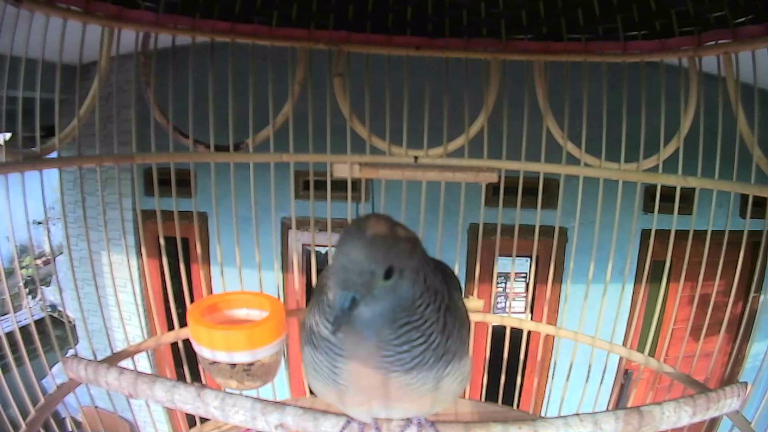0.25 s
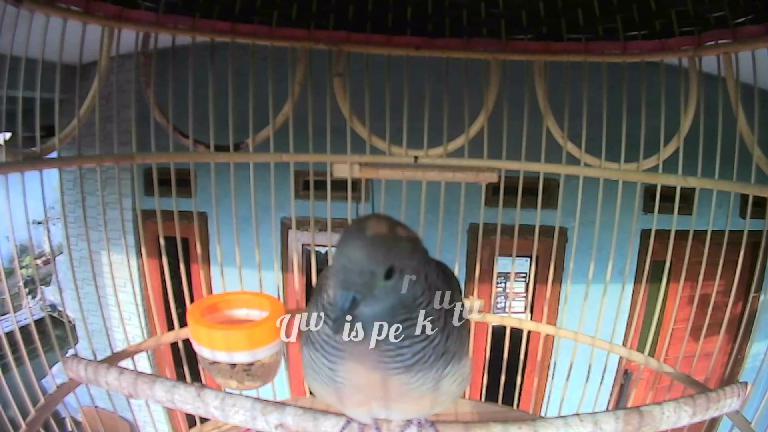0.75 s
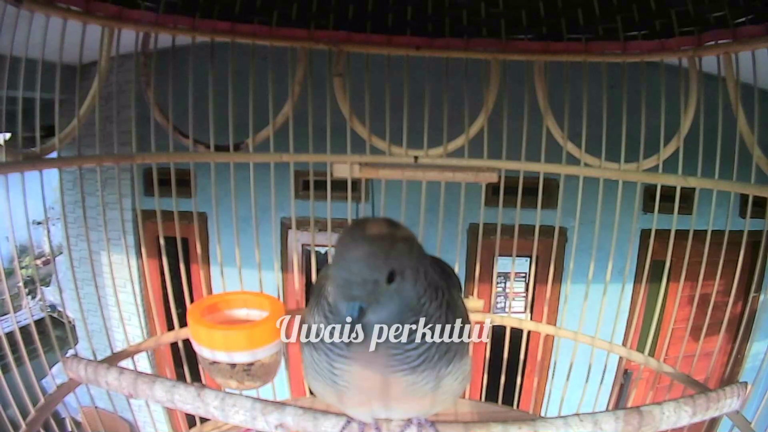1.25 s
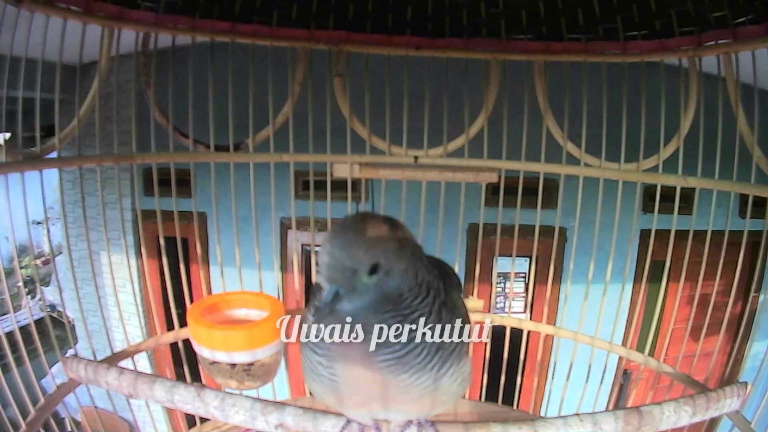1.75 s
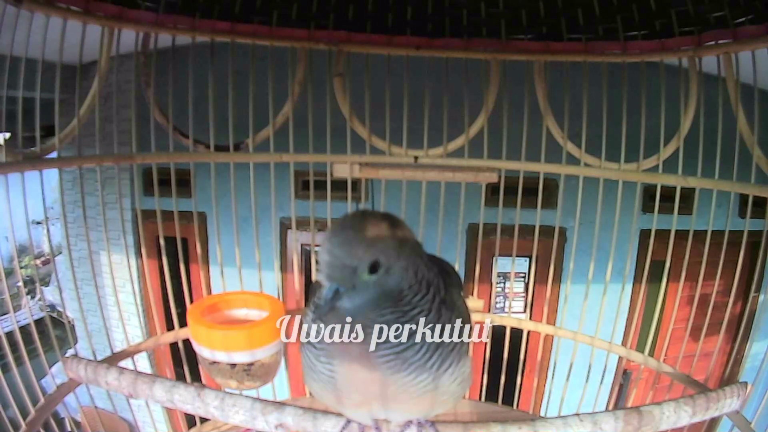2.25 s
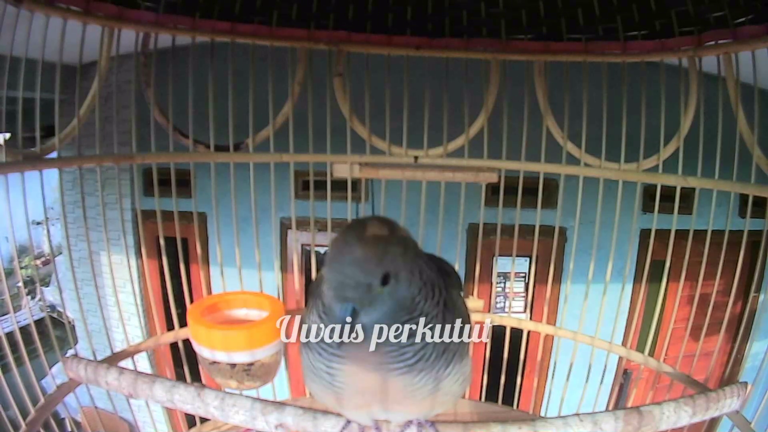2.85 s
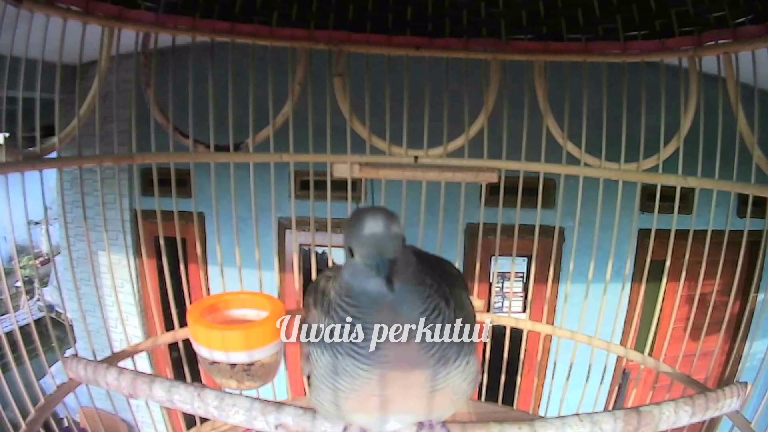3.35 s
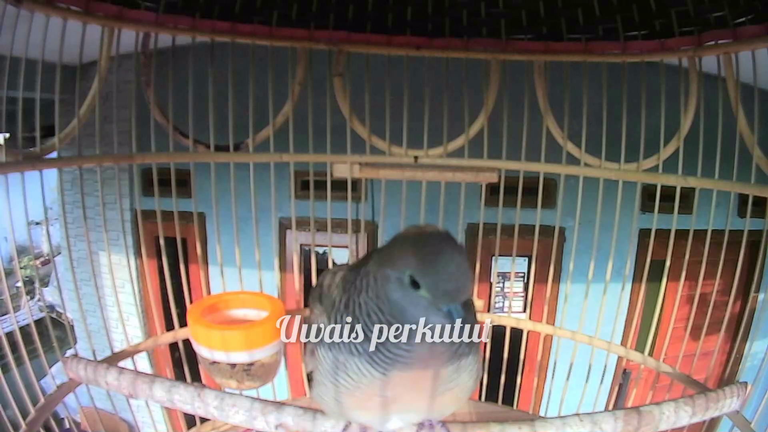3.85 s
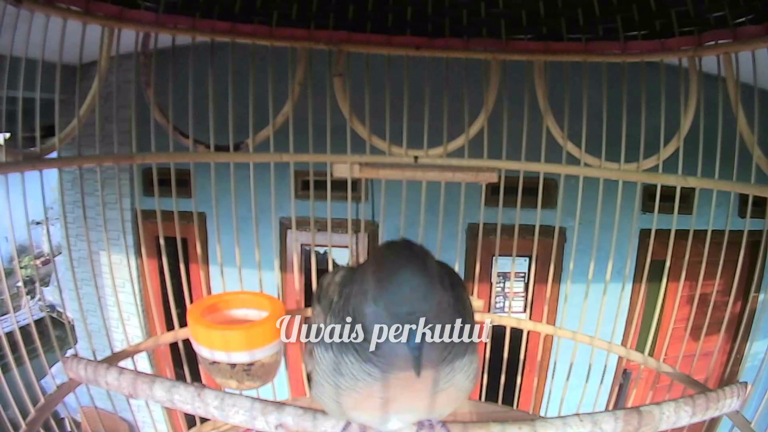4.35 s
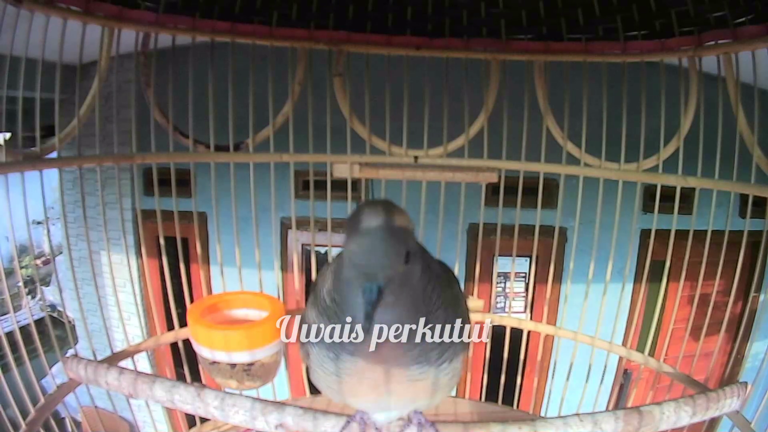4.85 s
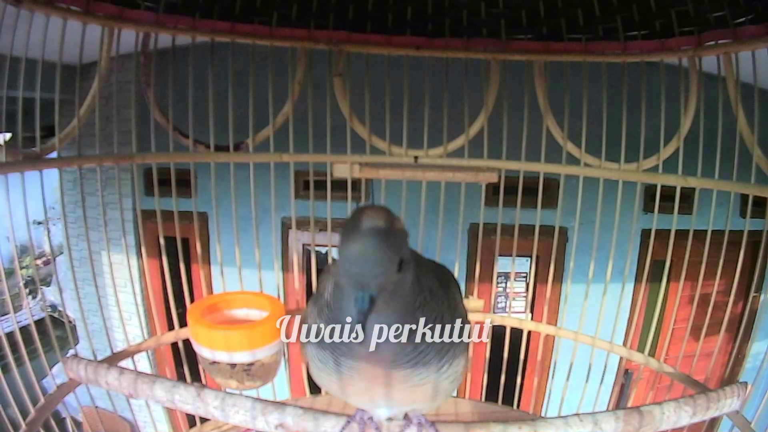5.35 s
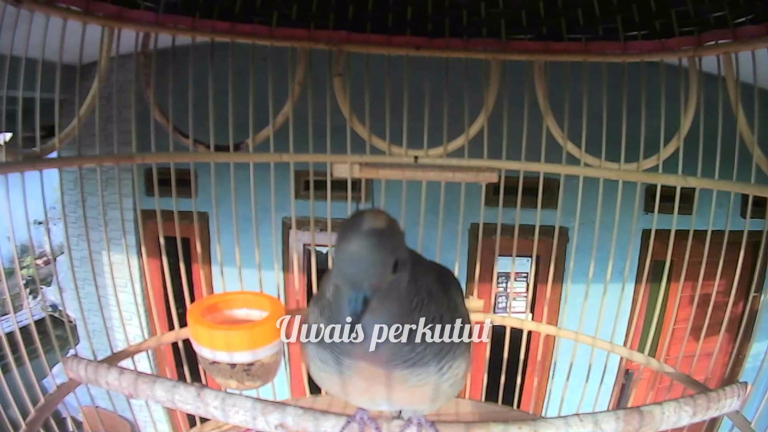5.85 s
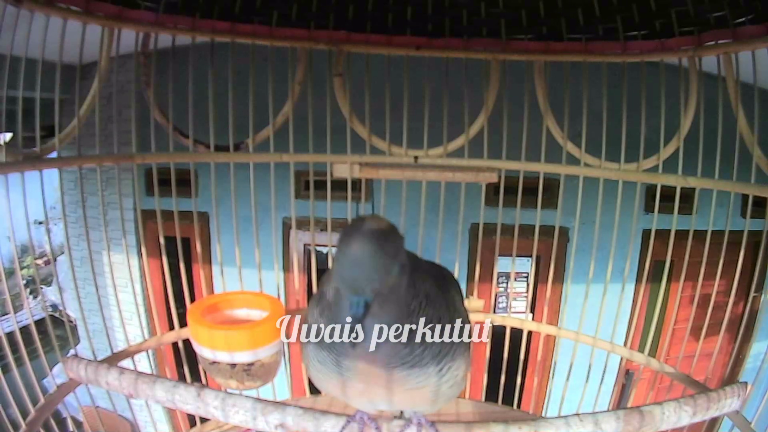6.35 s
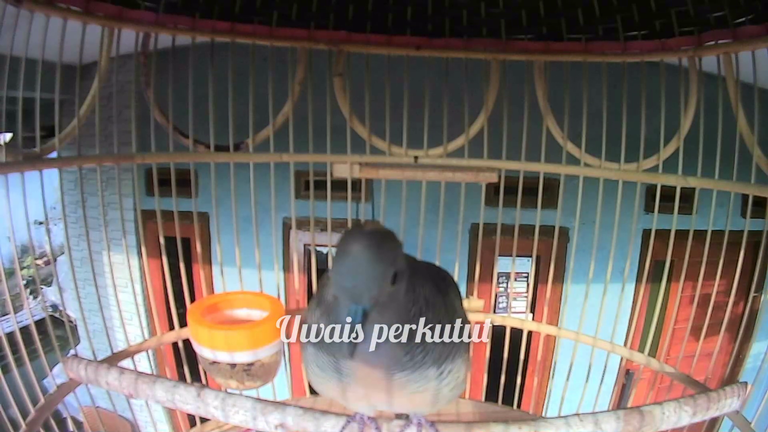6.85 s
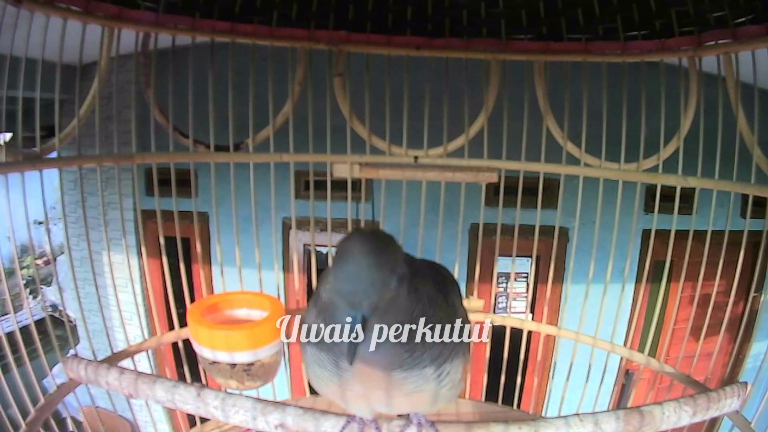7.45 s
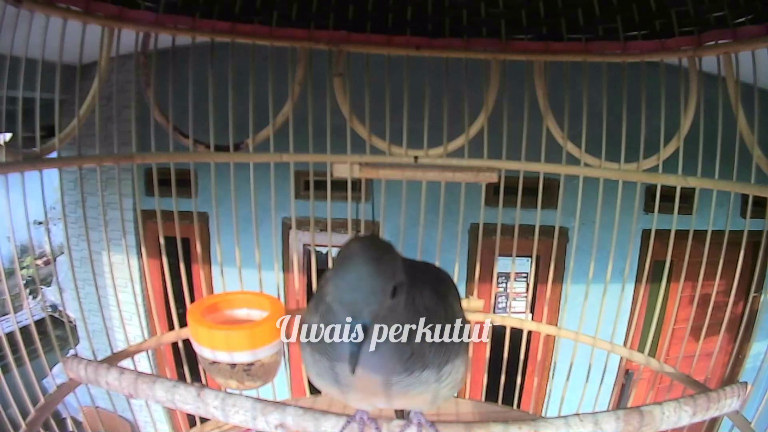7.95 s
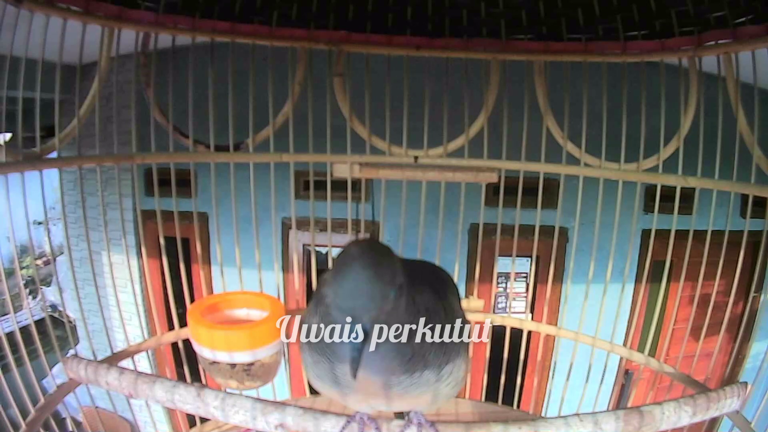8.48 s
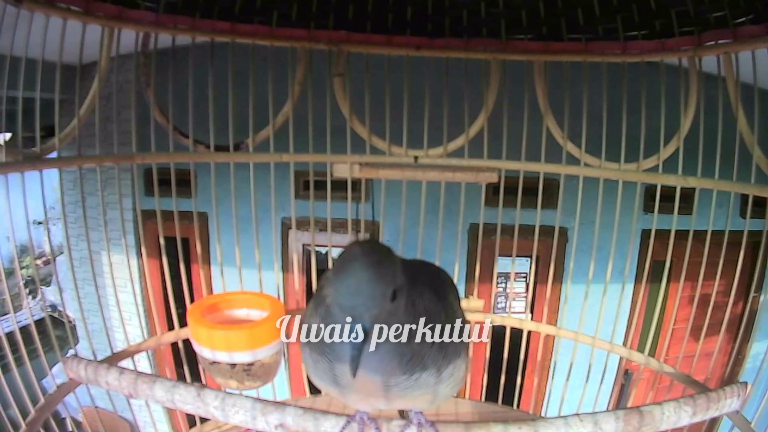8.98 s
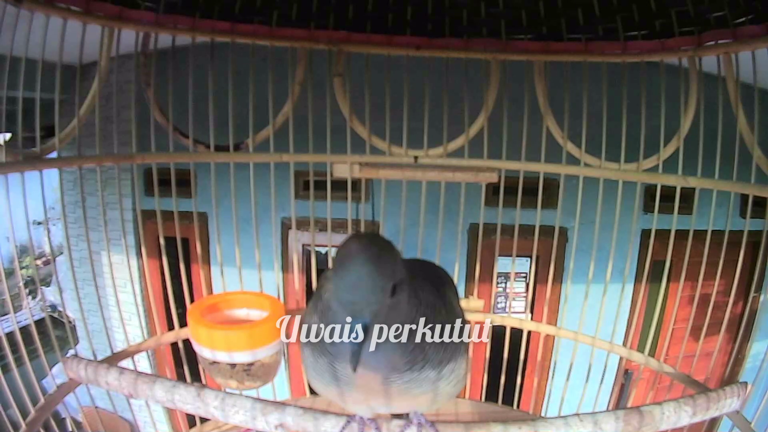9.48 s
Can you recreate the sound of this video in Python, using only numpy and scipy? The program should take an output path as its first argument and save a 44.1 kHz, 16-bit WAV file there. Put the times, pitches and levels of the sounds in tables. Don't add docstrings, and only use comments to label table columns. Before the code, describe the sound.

On a porch by a street, low engine idle and soft traffic rumble lie under faint songbirds and a distant dove. A neighbouring caged dove calls three times: a warbled fall, two short notes, a longer one. Just after five seconds a dove right at the small microphone coos a dozen loud, rapid, sputtering notes that clip, then two softer four-note phrases. Walls echo lightly.

```python
import sys
import numpy as np
from scipy import signal
from scipy.fft import rfft, irfft, next_fast_len
from scipy.io import wavfile
from scipy.ndimage import uniform_filter1d, map_coordinates

SR = 44100
rng = np.random.default_rng(int(sys.argv[2]) if len(sys.argv) > 2 else 0)


def amp(db):
    return 10 ** (np.asarray(db, float) / 20)


def write(x):
    x = np.atleast_2d(x).T
    wavfile.write(sys.argv[1], SR, np.round(np.clip(x, -1, 1) * 32767).astype(np.int16))


N = 428652

# snap to the high note in s, end in s, high note in Hz,
# effort at the snap in dB, held level in dB.
NEAR_BOUT = [(5.2854, 5.361, 1485, -5, -7.6), (5.411, 5.418, 1400, -.5, -6),
             (5.504, 5.530, 1425, -1.5, -6.5), (5.614, 5.637, 1430, -1.6, -5.2),
             (5.728, 5.828, 1480, -2.7, -9.7), (5.958, 6.059, 1480, -4, -8.5),
             (6.1925, 6.297, 1480, -4, -9), (6.4407, 6.555, 1475, -5, -9.5),
             (6.692, 6.807, 1475, -5.2, -9.7), (6.948, 7.062, 1469, -5.3, -10.2),
             (7.2125, 7.325, 1458, -5.5, -10.2), (7.4735, 7.587, 1447, -6.2, -10)]
NEAR_PHRASES = [
    (7.869, 7.912, 1405, -7.5, -10),
    (7.988, 8.015, 1400, -5.8, -9.3),
    (8.0955, 8.139, 1405, -8, -9),
    (8.238, 8.361, 1430, -7.5, -11.5),
    (8.7942, 8.833, 1400, -7.5, -10.5),
    (8.923, 8.949, 1400, -6.5, -10.5),
    (9.03, 9.062, 1394, -7.5, -9),
    (9.1503, 9.272, 1407, -6.6, -9.8),
]
# first slap in s, slap peak in dB, voice takes hold in s.
NEAR_ONSETS = [(5.248, -24, 5.266), (5.3783, -25.5, 5.386), (5.4829, -19.5, 5.487), (5.585, -24.5, 5.597),
               (5.7039, -22.5, 5.712), (5.9284, -25, 5.941), (6.1595, -26.5, 6.175), (6.4065, -27, 6.424),
               (6.6617, -26, 6.676), (6.9157, -27.5, 6.93), (7.178, -26, 7.194), (7.4389, -25, 7.456),
               (7.84, -24, 7.854), (7.9738, -29.5, 7.977), (8.0732, -28, 8.083), (8.2158, -23, 8.222),
               (8.7603, -28, 8.779), (8.9054, -28.5, 8.913), (9.0127, -25.5, 9.018), (9.1334, -32, 9.139)]
# multiple of the pitch, level in dB.
NEAR_OVERTONES = [(2, -35.5), (3, -61), (4, -57)]
# centre in Hz, width in Hz, level in dB.
THROAT_SAC = [(1200, 700, 4.5), (1800, 690, -8.5)]
SLAP_GAPS = [.0052, .0042, 0.003386, .0028, 0.002363, .0021, 0.0017, 0.0019]
# start in s, end in s, from Hz, to Hz, level in dB.
NEIGHBOUR_FALLS = [
    (1.243, 1.408, 1230, 1123, -15.5),
    (3.19, 3.315, 1215, 1145, -17.5),
    (5.178, 5.265, 1195, 1130, -20),
    (7.43, 7.59, 1193, 1105, -19),
]
# first crest in s, end in s, crests per second, depth in Hz, depth in dB.
NEIGHBOUR_WARBLE = [(1.277, 1.407, 26, 23, 0.5), (3.223, 3.321, 25.5, 18.6, 1), (5.211, 5.264, 25.5, 23, 1),
                    (7.454, 7.576, 29, 30, -1)]
# start in s, end in s, top in Hz, level in dB, time to the top in s.
NEIGHBOUR_ARCHES = [(1.424, 1.446, 1000, -19.5, 0.011), (1.494, 1.508, 1010, -19.5, 0.0033),
                    (1.577, 1.656, 1103, -17, 0.02), (3.313, 3.362, 1135, -16.5, .021),
                    (3.388, 3.41, 1060, -15, 0.0046), (3.457, 3.48, 1070, -16, .005),
                    (3.54, 3.633, 1112, -18, 0.0073), (5.296, 5.352, 1125, -19.5, .036),
                    (5.362, 5.387, 1040, -17, .016), (5.436, 5.463, 1045, -18, .005),
                    (5.53, 5.592, 1110, -18.5, 0.0056), (7.595, 7.635, 1070, -17, .006),
                    (7.675, 7.698, 1052, -16.5, 0.0039), (7.755, 7.846, 1106, -17.5, .005)]
# multiple of the pitch, level in dB.
NEIGHBOUR_OVERTONES = [(2, -44.5), (3, -39.5), (7, -44), (8, -64)]
# start in s, end in s, from Hz, to Hz, level in dB.
DISTANT_FALLS = [
    (0.151, 0.333, 1270, 1165, -46),
    (2.828, 3.04, 1265, 1144.5, -46),
    (9.619, 9.716, 1241, 1210, -51),
]
# start in s, end in s, top in Hz, level in dB, time to the top in s.
DISTANT_ARCHES = [
    (.345, .365, 1140, -37.5, .005),
    (.42, .44, 1125, -40, .005),
    (.54, .635, 1200, -40, 0.0099),
]
# start in s, end in s, from Hz, to Hz, crest in dB.
SONGBIRD_GLIDES = [(1.06, 1.3, 2640, 2620, -50), (1.31, 1.4, 2100, 2050, -50),
                   (2.24, 2.31, 2280, 2233, -44), (3.5, 3.6, 2740, 2600, -49),
                   (4.55, 4.68, 2536, 2620, -49), (8.48, 8.62, 2400, 2418, -49),
                   (9.66, 9.715, 2200, 2260, -49.5)]
# start in s, end in s, from Hz, to Hz, crest in dB.
MACHINE_WHINES = [
    (7.2, 7.9, 458, 474, -48.5),
    (8.3, 9.5, 999, 1017, -46.5),
]
# start in s, end in s, from Hz, to Hz, crest in dB.
PASSING_MOTOR = [
    (2.7, 3.25, 151.3, 152, -37),
    (3.4, 4.15, 130, 132, -37.5),
]
# start in s, peak in dB, centre in Hz, time to fall 60 dB in s.
CAGE_RUSTLES = [(2.4608, -39.5, 3746, 0.095), (3.291, -36.5, 3560, 0.08), (.146, -23, 2150, .2),
                (4.609, -40, 8500, 0.16), (7.6, -46, 8530, .15)]
# time in s, firing rate in Hz, throb in dB, drone in dB.
ENGINE_IDLE = [(0.0, 38.4, -40.5, -51.5), (2.03, 38.19, -33, -54.5), (3.25, 38.06, -40, -45),
               (3.44, 41.06, -36, -59.5), (4.52, 37.62, -37, -53.5), (9.56, 38.21, -37, -46),
               (9.72, 39.53, -38, -59)]
# multiple of the firing rate, level in dB.
ENGINE_ORDERS = [(2, 7), (3, 4), (4, 0), (5, 1.5)]
# time in s, level in dB.
TRAFFIC_LEVEL = [(0.0, -35.5), (1.43, -36), (1.59, -35), (5.9, -35.5), (6.79, -32), (9.72, -36)]
# frequency in Hz, density in dB per Hz.
RUMBLE_COLOUR = [(8.8, -31), (15, -3), (43, -3), (64, -4), (139, -8), (254, -23), (339, -30), (400, -35.5),
                 (520, -63.5), (880, -120)]
# frequency in Hz, density in dB per Hz.
MURMUR_COLOUR = [(150, -32.5), (250, -4.5), (339, -2.5), (400, -3), (450, -3), (583, -7), (687, -2.5),
                 (810, -4), (1180, -10), (1340, -8.5), (2030, -6.5), (2280, -1.5), (4150, -22.5),
                 (5400, -50.5), (9130, -120)]
# frequency in Hz, density in dB per Hz.
HISS_COLOUR = [(3800, -38), (4300, -13), (5450, -9.5), (5900, 0), (6300, 1), (6700, -5.5), (7100, 1),
               (7600, -8.5), (8200, -14), (9000, -17.5), (9600, -34), (12000, -59)]
# delay in s, level in dB.
WALL_ECHOES = [(.006, -27.5), (.011, -16.5), (.017, -23), (.024, -17), (.033, -28.5), (.046, -39),
               (0.06, -26.5)]
# frequency in Hz, density in dB per Hz.
GRIT_COLOUR = [(6000, -40), (8000, 0.5), (11000, -2), (15500, -5)]
# frequency in Hz, gain in dB.
MIC_RESPONSE = [(100, -0.5), (7400, 1.5), (8600, -3.5), (12500, -6), (14800, -5.5), (15650, -6.5),
                (15780, -70.5)]


def near_dove():
    # Hz at the start, Hz once it holds, rise in Hz/s, dB once it holds
    bout_low, phrase_low = (1075, 1140, 7500, -7.8), (1010, 1055, 16000, -11)
    # effort kept at the snap (0-1), place of the highest point (0-1), droop in Hz, release in s
    bout_end, phrase_end = (.5, .5, 85, .0065), (.1, .17, 45, .010)
    first_slap, peak_db, holds = np.transpose(NEAR_ONSETS)
    rows = [(*row, bout_low, bout_end) for row in NEAR_BOUT]
    rows += [(*row, phrase_low, phrase_end) for row in NEAR_PHRASES]
    notes = [coo(start, *row) for start, row in zip(holds, rows)]
    voice = whistle(notes, NEAR_OVERTONES, .003, waver_hz=3, bend_db=.3 * wobble(60), strain=0.055)
    tone = filtered(voice, lambda f: 1 + amp(-4) * resonance(f, hz=1190, width=26))
    return tone + flaps(first_slap, holds + .002, peak_db + 29.5, THROAT_SAC, swell_db=7.5, slow=1.05)


def coo(start, snap, end, high, effort, held, low, ending):
    attack_s, attack_db = .004, 11
    snap_s, snap_hz, settle_s, settle_hz = .004, 45, .015, 15
    sag_hz_per_s, droop_s = 500, .013
    release_hz, release_db = 30, 11
    low_start_hz, low_hz, rise_hz_per_s, low_db = low
    kept, top, droop_hz, release_s = ending
    length = end - snap
    room = np.clip(length / .1, .1, 1)
    droop = end - release_s - droop_s * room
    sag = high - sag_hz_per_s * length / 2
    drooped = sag - droop_hz * room
    push = max(1.1 * (effort - held - 3.3), .8) * room
    ready = low_hz + 10 * (effort + 5.5) + rise_hz_per_s * (snap - snap_s - start - attack_s)
    return shaped((start, low_start_hz, low_db - attack_db),
                  (start + attack_s, low_hz, low_db),
                  (snap - snap_s, ready, effort),
                  (snap, high - snap_hz, held + kept * (effort - held)),
                  (min(snap + settle_s, droop), high - settle_hz, held + .4 * push),
                  (min(snap + top * length, droop), high, held),
                  (droop, sag, held + push),
                  (end - release_s, drooped, held + push),
                  (end, drooped - release_hz, held - release_db))


def flaps(starts, ends, levels_db, throat, swell_db, slow):
    slaps = np.zeros(N)
    chances = rng.standard_normal((len(starts), 2, len(SLAP_GAPS)))
    gaps = slow * np.array(SLAP_GAPS)
    for start, end, level, (timing, force) in zip(starts, ends, levels_db, chances):
        at = start + np.cumsum(gaps * amp(.8 * timing)) - gaps[0]
        grown = 1 - np.exp(-(at - start) / 0.0055)
        slaps[(at * SR).astype(int)] = amp(level + swell_db * grown + 0.99 * force) * (at < end)

    def throat_response(f):
        soft = resonance(f, 1234, 1900) ** 2
        modes = sum((-1) ** k * amp(db) * resonance(f, hz, width) for k, (hz, width, db) in enumerate(throat))
        return soft * modes ** 2

    return filtered(slaps, throat_response)


def whistle(notes, overtones, edge, waver_hz, bend_hz=0, bend_db=0, strain=0):
    t = np.arange(N) / SR
    pitch, gain = np.full(N, 1000.), np.zeros(N)
    for note in notes:
        s, hz, db = np.transpose(note)
        on = slice(int((s[0] - edge) * SR), int((s[-1] + edge) * SR))
        pitch[on] = np.interp(t[on], s, hz)
        fade = np.clip(np.minimum(t[on] - s[0], s[-1] - t[on]) / edge + 1, 0, 1)
        gain[on] = np.maximum(gain[on], amp(np.interp(t[on], s, db)) * fade ** 2)
    pitch = uniform_filter1d(pitch, size=30) + bend_hz + waver_hz * wobble(90)
    phase = 2 * np.pi * np.cumsum(pitch) / SR
    rich_db = np.clip(strain * (pitch - 1470), -4.5, 0)
    wave = np.sin(phase)
    for k, db in overtones:
        level_db = db + rich_db * (round(k) == 2) + 2.1 * wobble(50)
        wave += amp(level_db) * np.sin(round(k) * phase)
    return np.sqrt(2) * uniform_filter1d(gain, size=40) * amp(bend_db) * wave


def neighbour_dove():
    t, swing_hz, swing_db = np.arange(N) / SR, np.zeros(N), np.zeros(N)
    for crest, end, rate, depth_hz, depth_db in NEIGHBOUR_WARBLE:
        on = (t > crest - .03) & (t < end)
        turn = 2 * np.pi * rate * (t[on] - crest)
        swing_hz[on] = depth_hz * (np.cos(turn) + 0.51 * np.sin(2 * turn))
        swing_db[on] = depth_db * np.cos(turn)
    notes = [fall(*row, fade_db=5) for row in NEIGHBOUR_FALLS]
    notes += [arch(*row, rest_hz=1000) for row in NEIGHBOUR_ARCHES]
    tone = whistle(notes, NEIGHBOUR_OVERTONES, 0.0037, waver_hz=6, bend_hz=swing_hz, bend_db=swing_db)
    opens = np.transpose(NEIGHBOUR_WARBLE)[0] - .034
    wide_throat = [(1130, 240, 3.6), (900, 340, -2.0)]  # Hz, width Hz, dB
    opening = flaps(opens - .028, opens + .012, np.full(len(opens), -4.), wide_throat, swell_db=13, slow=1.5)
    starts = np.array([note[0][0] for note in notes])
    levels_db = np.full(len(starts), -1.)
    sputter = flaps(starts - .015, starts - .004, levels_db, [(1080, 290, .1)], swell_db=3.5, slow=.8)
    return tone + opening + sputter


def fall(start, end, from_hz, to_hz, db, fade_db):
    swell_s, swell_db = .028, 5
    drop_s, drop_hz, drop_db = .013, 50, 3.5
    return shaped((start, from_hz - 12, db - swell_db),
                  (start + swell_s, from_hz, db),
                  (end - drop_s, to_hz, db - fade_db),
                  (end, to_hz - drop_hz, db - fade_db + drop_db))


def arch(start, end, top, db, climb, rest_hz):
    edge_s, edge_db, leap_s, droop_s = .004, 11.5, .004, .012
    sag = top - 400 * (end - start)

    def thin(hz):
        return db - 0.02 * max(hz - rest_hz, 0)

    return shaped((start, rest_hz, db - edge_db),
                  (start + edge_s, rest_hz, db - 2.0),
                  (start + climb, (top + rest_hz) / 2, db + .6),
                  (start + climb + leap_s, top, thin(top)),
                  (end - edge_s - droop_s * (top - rest_hz) / 100, sag, thin(sag)),
                  (end - edge_s, rest_hz, db - .6),
                  (end, rest_hz - 15, db - edge_db))


def far_birds():
    notes = [fall(*row, fade_db=-5) for row in DISTANT_FALLS]
    notes += [arch(*row, rest_hz=1110) for row in DISTANT_ARCHES]
    dove = whistle(notes, [], 0.0071, waver_hz=12, bend_db=2.6 * wobble(24))
    chirps = glides(SONGBIRD_GLIDES, crest=0.3, rise_db=3.5, fade_db=8.5)
    songbirds = whistle(chirps, [], 0.0086, waver_hz=30.0)
    hums = glides(MACHINE_WHINES + PASSING_MOTOR, crest=.7, rise_db=12.5, fade_db=10.5)
    machines = whistle(hums, [], .06, waver_hz=5.6)
    return dove + songbirds + machines


def glides(rows, crest, rise_db, fade_db):
    return [shaped((start, from_hz, db - rise_db),
                   (start + crest * (end - start), from_hz + crest * (to_hz - from_hz), db),
                   (end, to_hz, db - fade_db))
            for start, end, from_hz, to_hz, db in rows]


def rustles():
    out, t = np.zeros(N), np.arange(SR // 4) / SR
    for s, db, hz, t60 in CAGE_RUSTLES:
        band = signal.butter(4, [hz * .88, hz * 1.17], "bandpass", fs=SR, output="sos")
        puff = unit(signal.sosfilt(band, rng.standard_normal(len(t))))
        out[round(s * SR):][:len(t)] += amp(db - 12.0 - 60 * t / t60) * puff
    return out


def porch(x, early_db, tail_db, t60):
    t = np.arange(SR // 2) / SR
    tail = rng.standard_normal(len(t)) * amp(-60 * t / t60) * np.clip(t / 0.015, 0, 1)
    answer = amp(tail_db) * tail / np.linalg.norm(tail)
    for s, db in WALL_ECHOES:
        answer[round(s * SR)] += amp(db + early_db)
    return x + signal.fftconvolve(x, answer)[:N]


def overload(x, top, hard, leak_db, grit_db, grit_grows):
    coarse = signal.resample_poly(x, 160, 441)
    clipped = coarse / (1 + np.abs(coarse / top) ** hard) ** (1 / hard)
    excess = clipped - coarse
    smooth = signal.resample_poly(excess, 3, 1)
    spikes = np.kron(excess, [3, 0, 0])
    cut = np.abs(signal.resample_poly(excess, 441, 160)[:N])
    cut = np.abs(uniform_filter1d(cut, size=18))
    grit = amp(grit_db) * cut ** grit_grows * rush(GRIT_COLOUR, patchy_db=1.5)
    leaky = smooth + amp(leak_db) * (spikes - smooth)
    return x + grit + signal.resample_poly(leaky, 147, 160)[:N]


def street():
    rumble_db, = curves(TRAFFIC_LEVEL)
    swing_db = 0.15 * (rumble_db - rumble_db.mean())
    firing_hz, throb_db, drone_db = curves(ENGINE_IDLE)
    phase = 2 * np.pi * np.cumsum(firing_hz + .3 * wobble(3.3)) / SR
    engine = amp(throb_db + .7 + 3.2 * wobble(3)) * np.sin(phase)
    for k, db in ENGINE_ORDERS:
        engine += amp(drone_db + db + 3.2 * wobble(2.5)) * np.sin(round(k) * phase)
    rumble = amp(rumble_db - .9 + 1.6 * wobble(5)) * rush(RUMBLE_COLOUR, patchy_db=1.5)
    murmur = amp(-43.5 + swing_db) * rush(MURMUR_COLOUR, patchy_db=2.3)
    hiss = amp(-57.5 + swing_db + 0.49 * wobble(27)) * rush(HISS_COLOUR, patchy_db=2.0)
    return np.sqrt(2) * engine + rumble + murmur + hiss


def rush(spectrum, patchy_db):
    z = signal.stft(rng.standard_normal(N), nperseg=512)[2]
    field = uniform_filter1d(rng.standard_normal(z.shape), 4, 0)
    field = uniform_filter1d(field, 8, 1)
    noise = signal.istft(z * amp(patchy_db * unit(field)), nperseg=512)[1][:N]
    hz, db = np.transpose(spectrum)
    return unit(filtered(noise, lambda f: amp(np.interp(np.log(f + 1), np.log(hz + 1), db))))


def resonance(f, hz, width):
    return 1j * f * width / (hz * hz - f * f + 1j * f * width)


def filtered(x, response):
    m = next_fast_len(N + SR // 2)
    return irfft(rfft(x, m) * response(np.fft.rfftfreq(m, 1 / SR)), m)[:N]


def shaped(*points):
    note = np.array(points, float)
    times = np.maximum.accumulate(note[:, 0] + 1e-4 * np.arange(len(note)))
    return np.column_stack([times, note[:, 1:]])


def wobble(rate):
    coarse = np.arange(0, N + 32, 32)
    knots = rng.standard_normal(int(N * rate / SR) + 4)
    return np.interp(np.arange(N), coarse, map_coordinates(knots, [coarse * rate / SR]))


def curves(rows):
    s, *cols = np.transpose(rows)
    return [np.interp(np.arange(N) / SR, s, c) for c in cols]


def unit(x):
    return x / np.sqrt(np.mean(x ** 2) + 1e-20)


def scene():
    near = porch(near_dove(), early_db=-11.5, tail_db=-23, t60=0.49)
    neighbour = porch(neighbour_dove(), early_db=-1.5, tail_db=-20.0, t60=0.45)
    far = porch(far_birds(), early_db=3.5, tail_db=-9.5, t60=0.6)
    birds = overload(near + neighbour + far, top=0.71, hard=35, leak_db=-37, grit_db=-36.5, grit_grows=.42)
    return (birds + rustles() + street())[None]


def band_limit(x):
    return signal.sosfilt(signal.butter(12, 15730, fs=SR, output="sos"), x)


def record(dry):
    hz, db = np.transpose(MIC_RESPONSE)
    coloured = filtered(dry[0], lambda f: amp(np.interp(f, hz, db)))
    hiss = amp(-85.5) * rush([(8000, -22), (12000, -15.5), (14500, 0.3)], patchy_db=1.5)
    mix = (coloured + hiss)[None] + .0055
    return band_limit(mix)


dry = scene()
out = record(dry)
write(out)
```